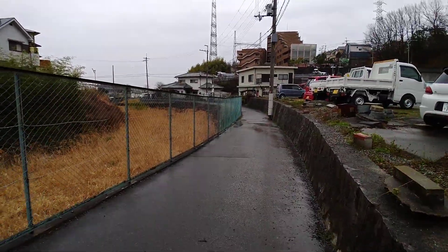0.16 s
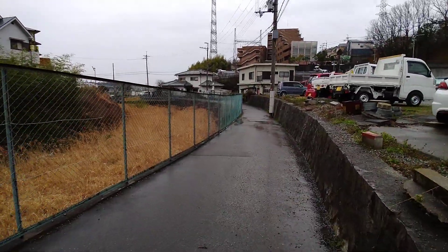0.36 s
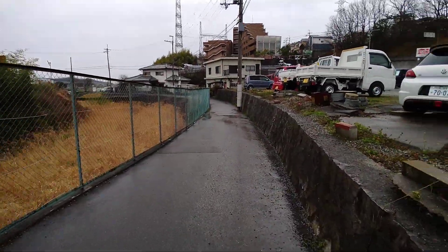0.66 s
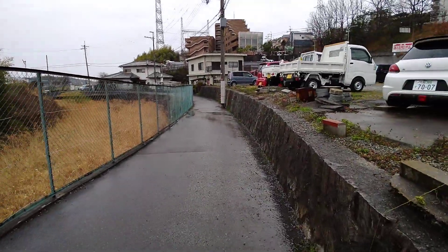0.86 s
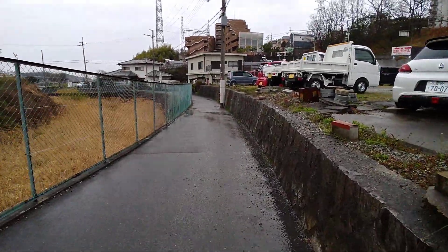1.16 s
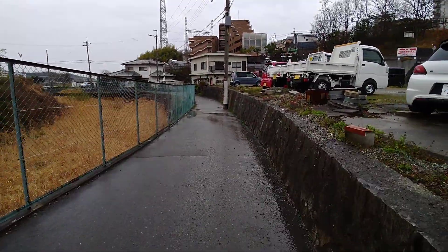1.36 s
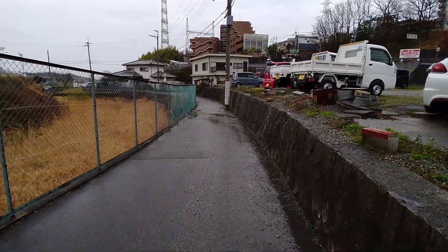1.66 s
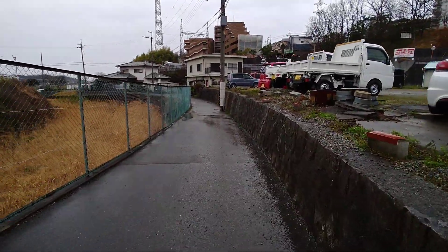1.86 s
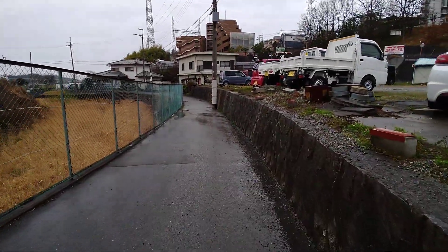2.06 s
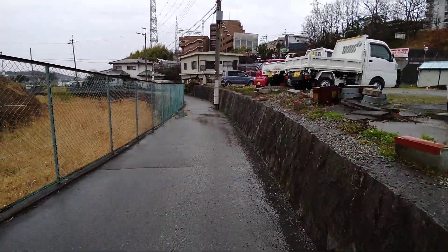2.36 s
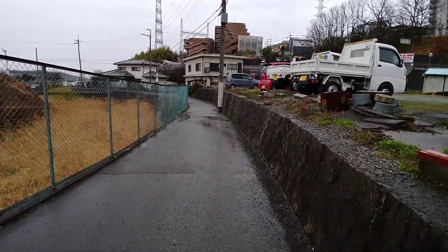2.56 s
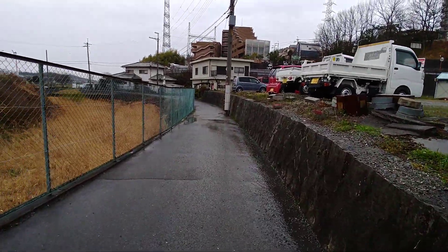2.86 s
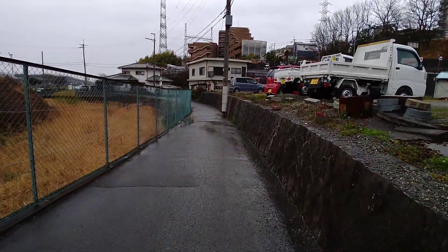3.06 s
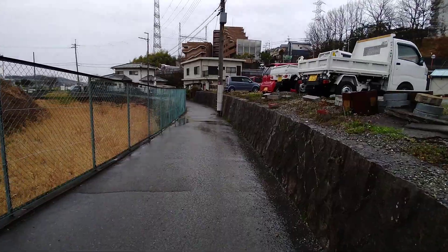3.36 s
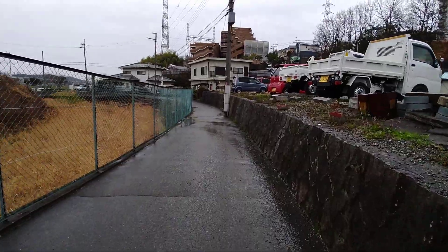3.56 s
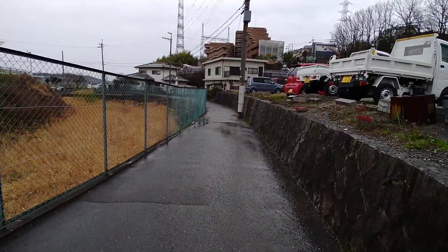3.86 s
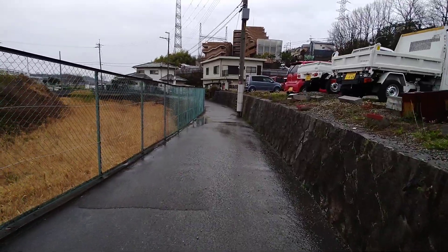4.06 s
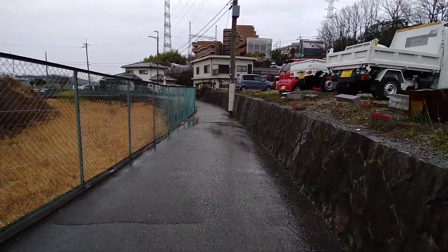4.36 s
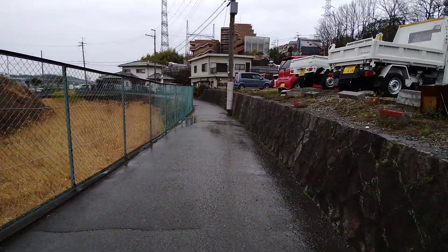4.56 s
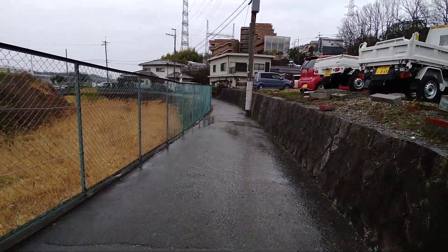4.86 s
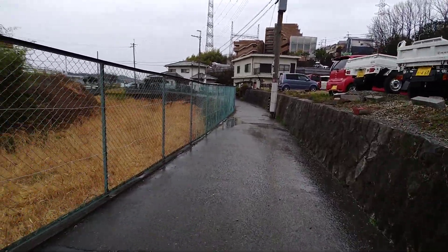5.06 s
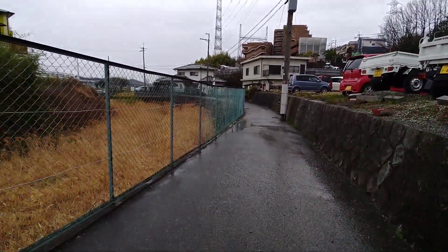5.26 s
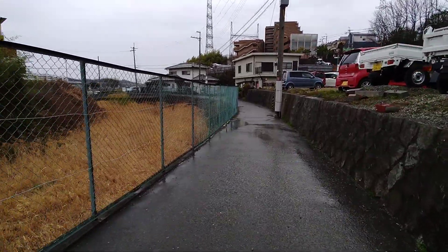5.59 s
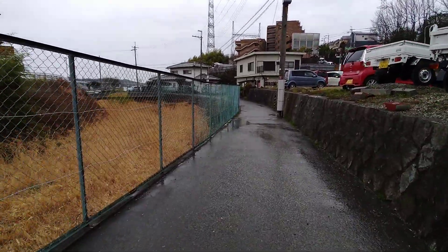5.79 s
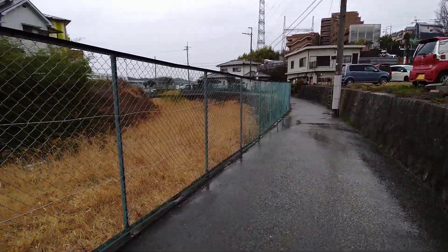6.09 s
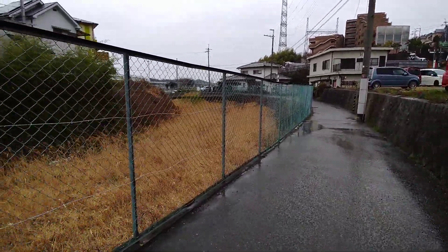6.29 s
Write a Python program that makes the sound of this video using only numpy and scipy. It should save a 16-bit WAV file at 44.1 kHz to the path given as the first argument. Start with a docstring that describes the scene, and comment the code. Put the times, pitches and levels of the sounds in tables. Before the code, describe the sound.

Footsteps on wet gritty asphalt with short hollow thumps on the left, passing water that gurgles and hisses in a drain, then fades.

```python
"""Rain water rushes through a drain on the right, passed on a walk along a wet asphalt path.
Tumbling in its concrete channel, it rumbles, gurgles and splashes; up close the air in its mouth
rings and its spray hisses, then it all fades behind a wall. A short hollow thump on the left keeps
time with the steps; soles scuff and crack wet grit over a faint town hush."""
import sys
import numpy as np
from scipy import signal
from scipy.fft import rfft, irfft, next_fast_len
from scipy.io import wavfile
from scipy.ndimage import uniform_filter1d, map_coordinates

SR = 44100
rng = np.random.default_rng(int(sys.argv[2]) if len(sys.argv) > 2 else 0)


def dump(signal):
    """Clip the signal to [-1, 1] and save it as 16-bit WAV at the path in sys.argv[1]."""
    limited = np.clip(np.atleast_2d(signal).T, -1, 1)
    pcm = np.round(limited * 32767).astype(np.int16)
    wavfile.write(sys.argv[1], SR, pcm)


N = 283563
TIME = np.arange(N) / SR
FADE_DB_PER_S = 15  # the drain dying away behind the walker

# stereo width of the noise layers: f/Hz, left-right correlation
STEREO_LIKENESS = [(60, 0.89), (130, 0.78), (290, 0.98), (640, 0.86), (1410, 0.22), (2500, -0.67),
                   (7000, 0.7)]
# short hollow thumps on the left, in time with the steps: t/s at the crest, level/dB
THUMPS = [(.0025, -8), (0.6397, -6), (1.2546, -4.5), (2.1615, -5.5), (2.7855, -5.5), (3.4541, -7),
          (4.0409, -13), (4.601, -16), (5.2312, -17), (5.853, -15.5), (6.383, -15)]


def amp(db):
    """Decibels to gain."""
    return 10 ** (np.asarray(db) / 20)


def unit(x):
    """x scaled to rms 1."""
    return x / np.sqrt(np.mean(x ** 2) + 1e-20)


def along(points, hz):
    """A curve through (f/Hz, value) points on a log axis."""
    f, v = np.transpose(points)
    return np.interp(np.log(hz + 1), np.log(f + 1), v)


def pan(db):
    """Stereo gains with a mean of one, left over right by db."""
    g = amp(np.atleast_1d(db))
    return np.array([2 * g / (1 + g), 2 / (1 + g)])


def wobble(rate):
    """A smooth random curve, rate knots a second."""
    return map_coordinates(rng.standard_normal(int(N * rate / SR) + 4), [TIME * rate])


def filtered(x, response):
    """x through an EQ given as gain against frequency."""
    m = next_fast_len(N + 8192)
    return irfft(rfft(x, m) * response(np.fft.rfftfreq(m, 1 / SR)), m)[..., :N]


def band(x, hz, spread):
    """x through a broad resonance from hz / spread to hz * spread."""
    edges = [min(hz / spread, 15000), min(hz * spread, 19000)]
    return signal.sosfilt(signal.butter(1, edges, "band", fs=SR, output="sos"), x)


def add(track, s, sound):
    """Lay a stereo sound into the track from s seconds on."""
    i = int(np.clip(round(s * SR), 0, N - 1))
    track[:, i:i + sound.shape[1]] += sound[:, :N - i]


def wash(spectrum, grains=0, grain_db=0, patchy_db=1):
    """Stereo rush with drifting patches and grains in it; its mid channel has rms 1."""
    noise = signal.stft(rng.standard_normal((2, N)), nperseg=512)[2]
    patches = uniform_filter1d(uniform_filter1d(rng.standard_normal(noise.shape[1:]), 5, 0), 12, 1)
    rush = signal.istft(noise * amp(patchy_db * unit(patches)), nperseg=512)[1][:, :N]

    def tone_and_width(hz):
        turn = np.arccos(along(STEREO_LIKENESS, hz)) / 2
        roll_off = 1 / np.maximum(hz / spectrum[-1][0], 1) ** 2
        return amp(along(spectrum, hz)) * roll_off * [np.cos(turn), np.sin(turn)]

    mid, side = filtered(unit(rush) + amp(grain_db) * grains, tone_and_width)
    return np.array([mid + side, mid - side]) / mid.std()


def hush(db=-58):
    """A steady bed of far traffic and trickling water all around."""
    # tone of the bed: f/Hz, relative level/dB
    tone = [(20, -20), (45, -4), (110, 4.5), (170, -5.5), (240, 3.5), (340, -8.5), (480, -6), (760, -14),
            (1700, -13.5), (2800, -20), (5000, -26), (7500, -33.5), (10000, -27), (12500, -34.5),
            (15800, -35)]
    # its balance: f/Hz, left over right/dB
    balance = [(100, 2.5), (300, 2.5), (1500, 1), (3000, -7), (6000, -14.5), (12000, -10.5)]
    air = amp(db) * wash(tone, patchy_db=.7)
    return filtered(air, lambda hz: pan(along(balance, hz)))


def grit(crack_hz=6750, snap_s=.0006, tail_s=.014, tail_db=-23, gain_db=8.5, crumb_db=-51, stride_s=.6):
    """Stones snap underfoot and crumbs crackle through every stride; the wall scatters each snap."""
    # the loudest stones trodden on: t/s, relative level/dB
    trodden = [(0.1367, -41.5), (0.3152, -37.5), (0.4369, -38), (0.5135, -40.5), (0.5884, -41),
               (1.1718, -35), (1.3999, -21), (3.6215, -32), (3.6661, -34), (4.1268, -39.5), (4.1926, -39),
               (4.2388, -42), (4.4449, -40), (4.7212, -36.5), (4.9322, -38.5), (5.0358, -42.5),
               (5.1612, -45.5), (5.3064, -38), (5.4485, -46), (5.5742, -45), (6.034, -45), (6.1479, -46.5),
               (6.2492, -43), (6.356, -43)]
    snap_delay_s = .0013  # each snap sounds this long after its listed time
    stones = [(s + snap_delay_s, db, crack_hz) for s, db in trodden]
    crumbs = [(s + stride_s * rng.random(), crumb_db + 3 * rng.normal(), crack_hz * 1.06 ** rng.normal())
              for s, _ in THUMPS for _ in range(15)]
    out = np.zeros((2, N))
    t = np.arange(SR // 25) / SR
    decay = np.exp(-t / snap_s) + amp(tail_db) * np.exp(-t / tail_s)
    for s, db, hz in stones + crumbs:
        crack = band(rng.standard_normal((2, len(t))) * decay, hz, spread=3.1)
        add(out, s, amp(db + gain_db) * crack / np.linalg.norm(crack, axis=1, keepdims=True))
    # EQ on both sides, then on the left alone: f/Hz, gain/dB
    colour = [(800, 17), (1700, 15), (3000, 6.5), (6000, 5), (10000, 10), (12500, 5), (15500, -10)]
    shade = [(1000, 6.5), (3000, -5), (7000, -21)]
    return filtered(out, lambda hz: amp([along(colour, hz) + along(shade, hz), along(colour, hz)]))


def scuffs(spread=1.435, delay_scatter=.12, scatter_db=2.5):
    """Soles slap and rub in quick swells of gritty noise, no two steps alike."""
    # slap, wet squelch and settling weight of each step:
    # delay/s, level over the thump/dB, f/Hz, length/s, left over right/dB
    foot_roll = [(.016, -35, 430, .018, 4), (.024, -48, 2200, 0.029, -4), (.105, -40.5, 140, .016, 14)]
    # stray scuffs and bumps: t/s, level/dB, f/Hz, length/s, left over right/dB
    strays = [(0.49, -40.5, 880, 0.02, -1), (1.072, -31, 576, .012, 3), (1.404, -35.5, 1300, 0.023, -15.5),
              (2.857, -35, 1820, 0.0063, -8), (3.062, -40.5, 1990, .0038, -15),
              (3.907, -40, 239, 0.0079, 31), (4.637, -45, 520, .0066, -1.5), (5.3, -53.5, 1960, 0.014, -3),
              (5.948, -50, 128, 0.0183, 12), (6.038, -59.5, 2060, 0.01, -11)]
    rolls = [(s + delay * np.exp(delay_scatter * rng.normal()),
              db + over_db + scatter_db * rng.normal(), *shape)
             for s, db in THUMPS for delay, over_db, *shape in foot_roll]
    out = np.zeros((2, N))
    t = np.arange(SR // 5) / SR
    for s, db, hz, length, side_db in rolls + strays:
        noise = rng.standard_normal((3, len(t))) * amp(1.14 * rng.standard_normal(len(t)))
        shared = np.clip(along(STEREO_LIKENESS, hz), 0, 1)
        stereo = np.sqrt(shared) * noise[2] + np.sqrt(1 - shared) * noise[:2]
        rub = unit(band(band(stereo, hz, spread), hz, spread))
        age = 2 * t / length  # 1 at the crest
        add(out, s - length / 2, amp(db) * age * np.exp(1 - age) * rub * pan(side_db))
    return out


def thumps(thump_hz=205.6, swell_s=.0059, knock_hz=450, knock_db=-31,
           boom_hz=188, boom_db=-35, boom_t60=.69, tick_hz=1200, tick_db=-42):
    """Hollow thumps of a few cycles on the left; a tick marks each crest and a faint boom lingers."""
    out = np.zeros((2, N))
    age = np.arange(SR // 3) / SR
    tick = band(band(signal.unit_impulse(len(age)), tick_hz, 2.2), tick_hz, 2.2)
    tick *= amp(tick_db) / np.abs(tick).max()
    for s, db in THUMPS:
        t = TIME - s
        body = np.sin(2 * np.pi * thump_hz * t) + amp(knock_db) * np.sin(2 * np.pi * knock_hz * t)
        out[0] += amp(db) * np.exp(-(t / swell_s) ** 2 / 2) * body
        boom = unit(band(band(rng.standard_normal(len(age)), boom_hz, 1.42), boom_hz, 1.42))
        boom *= amp(db + boom_db - 60 * age / boom_t60)
        add(out, s, (boom + tick) * pan(22))
    return out


def bubbles(rate, lo_hz, hi_hz, cycles, scatter_db, rise=.16):
    """A stereo stream of bubbles: damped rings that rise in pitch, a few far louder than the rest."""
    t = np.arange(int(min(2 * cycles / lo_hz, .03) * SR) + 8) / SR
    sides = []
    for _ in range(2):
        pitch, rarity, onset = np.hsplit(rng.random((int(rate * N / SR), 3)), 3)
        hz = lo_hz * (hi_hz / lo_hz) ** pitch
        age = t * hz / cycles
        size = amp(-scatter_db * np.log(np.maximum(rarity, .004)))
        glide = 1 + rise * np.minimum(age, 1) / 2
        rings = size * np.exp(-np.pi * age) * np.sin(2 * np.pi * hz * t * glide)
        at = (onset * N).astype(int) + np.arange(len(t))
        sides.append(unit(np.bincount(at.ravel(), rings.ravel(), N)[:N]))
    return np.array(sides)


def passing(rise, reached_s, db, sag, passed_s, fall):
    """Level in dB of a voice that is approached, walked along and left behind."""
    return (db - rise * np.maximum(reached_s - TIME, 0)
            - sag * (np.clip(TIME, reached_s, passed_s) - reached_s)
            - fall * np.maximum(TIME - passed_s, 0))


def wall(start_s=3.652, takes_s=.19, depth_db=7.5):
    """Gain in dB as a wall comes between drain and walker: a quick drop, then a steady fade."""
    behind_s = np.maximum(TIME - start_s, 0)
    return -depth_db * np.minimum(behind_s / takes_s, 1) - FADE_DB_PER_S * behind_s


def spray(surge_db):
    """Fine drops hiss in spurts, hard right."""
    # tone of the hiss: f/Hz, relative level/dB
    tone = [(2500, -7.5), (3800, -12.5), (5400, -9), (6300, -1), (8000, 1.5), (10000, 3.5), (12000, -4),
            (13500, -15), (15800, -29)]
    # its fader ride: t/s, level/dB
    ride = [(0.06, -73), (0.35, -69), (0.779, -70), (1.0, -59), (1.35, -46), (1.7, -45.0), (2.33, -37),
            (2.75, -45.0), (3.25, -46), (3.5, -52), (3.72, -61.5), (4.1, -67.5)]
    s, db = np.transpose(ride)
    level_db = np.interp(TIME, s, db) - FADE_DB_PER_S * np.maximum(TIME - s[-1], 0)
    spurts_db = .8 * wobble(90) + .63 * wobble(16)
    drops = bubbles(900, 4000, 13000, cycles=1.6, scatter_db=4)
    return amp(level_db + surge_db + spurts_db) * wash(tone, drops, grain_db=-6) * pan(-23)


def mouth(nearest_s=2.1, width_s=.19, db=-34):
    """Splashing rings the air in the drain's mouth, which beams out and is heard briefly in passing."""
    level_db = db - 12.8 * np.log10(1 + ((TIME - nearest_s) / width_s) ** 2) + wall()
    # resonance of the mouth: f/Hz, relative level/dB
    tone = [(450, -26), (620, -16), (715, -0.5), (830, -7), (960, -9.5), (1400, -22), (2000, -26)]
    return amp(level_db + .52 * wobble(11)) * wash(tone, patchy_db=3.5) * pan(1.25)


def drain(bend=.26, left_lag_s=.000085):
    """Water tumbles in a concrete channel: lows near the centre, splash and spray to the right."""
    # tones of the water's four voices: f/Hz, relative level/dB
    rumble_tone = [(20, -58), (45, -12), (80, 4.5), (130, 2), (200, -3), (400, -49)]
    hollow_tone = [(110, -38), (190, -6.5), (255, 2.5), (345, -6.5), (445, -0.5), (570, -6), (750, -4),
                   (1100, -15.5), (1800, -67)]
    gurgle_tone = [(60, -29), (150, -1.5), (290, 7), (400, -6.5), (580, -1.5), (850, 0), (1100, 3),
                   (1500, 3), (1800, -13.5), (2200, -13), (4000, -78)]
    splash_tone = [(900, -3.5), (1500, -1.5), (1900, -4), (2400, 5.5), (2800, 6.5), (3300, -5), (4500, -8),
                   (7000, -16)]
    # pass-by of each voice: rise/(dB/s), reached/s, level/dB, sag/(dB/s), passed/s, fall/(dB/s)
    pass_by = {"rumble": (1, 1.6, -42, 5, 2.5, 76), "hollow": (11.5, 0.72, -38, 1.4, 3, 11),
               "gurgle": (2, 1.0, -35.5, 3.5, 2.5, 12.5), "splash": (32, 1.02, -51, -2, 2, 5)}
    wall_db = wall()
    rumble_db, hollow_db, gurgle_db, splash_db = [
        passing(*pass_by[voice]) + wall_db for voice in ("rumble", "hollow", "gurgle", "splash")]
    # the channel keeps some rumble, which bends round the wall
    rumble_db = np.maximum(rumble_db, hollow_db - 12) - bend * wall_db
    splash_db = np.maximum(splash_db, gurgle_db - 30)  # gurgling always splashes a little
    big = bubbles(350, 331, 1640, cycles=15, scatter_db=1)
    small = bubbles(900, 1424, 4540, cycles=12.6, scatter_db=3)
    surge_db = .5 * wobble(28) + .5 * wobble(7.04)  # each slop of water lifts several voices at once
    rumble = amp(rumble_db + 1.6 * wobble(13)) * wash(rumble_tone)
    hollow = amp(hollow_db + surge_db + .4 * wobble(3.9)) * wash(hollow_tone, patchy_db=1.5)
    gurgle = amp(gurgle_db + surge_db) * wash(gurgle_tone, big, grain_db=-13.5, patchy_db=2)
    splash = amp(splash_db + surge_db) * wash(splash_tone, small, grain_db=-10.5, patchy_db=2)
    water = rumble * pan(.95) + hollow * pan(-.25) + gurgle * pan(.85) + splash * pan(-8.5)
    left, right = water + mouth() + spray(surge_db)
    return np.array([filtered(left, lambda hz: np.exp(-2j * np.pi * hz * left_lag_s)), right])


def scene():
    """Drain, thumps and footsteps over the town hush."""
    return drain() + thumps() + scuffs() + grit() + hush()


def record(dry, top_hz=15850):
    """A brick-wall high cut on the mix."""
    return filtered(dry, lambda hz: hz < top_hz)


dry = scene()
out = record(dry)
dump(out)
```